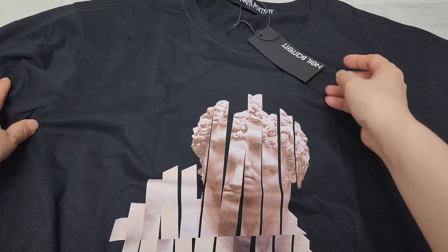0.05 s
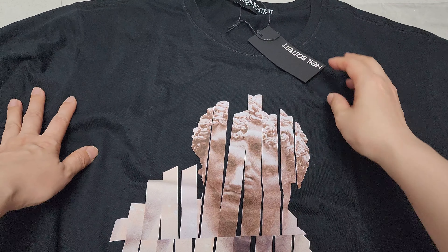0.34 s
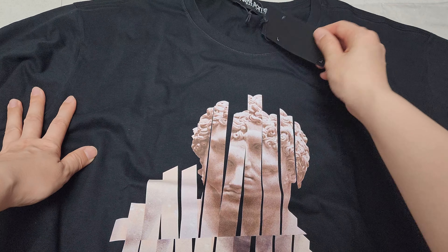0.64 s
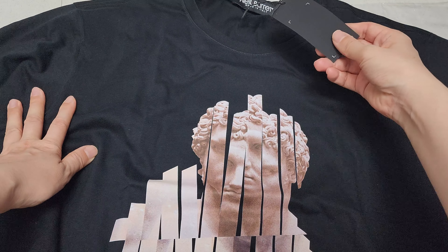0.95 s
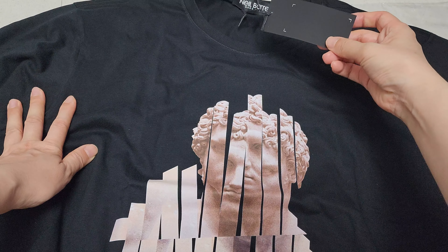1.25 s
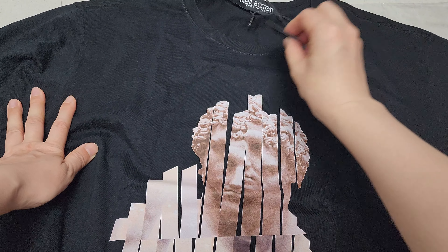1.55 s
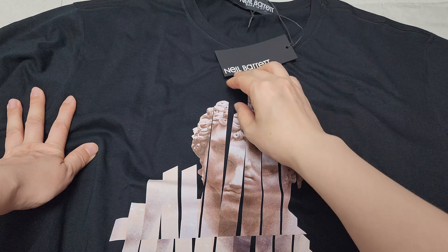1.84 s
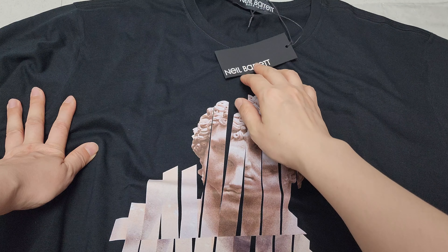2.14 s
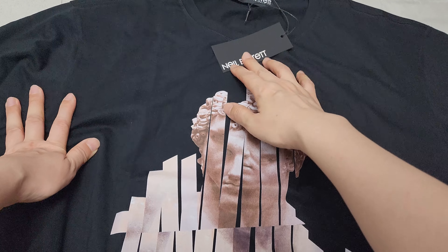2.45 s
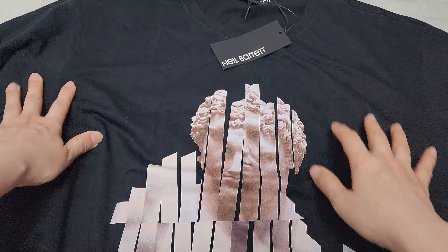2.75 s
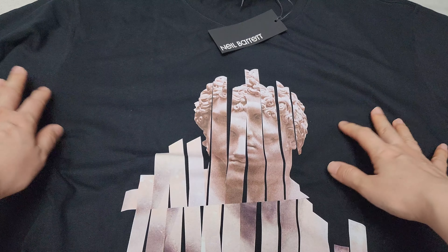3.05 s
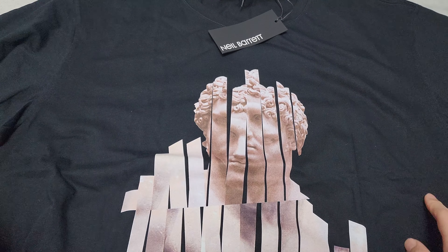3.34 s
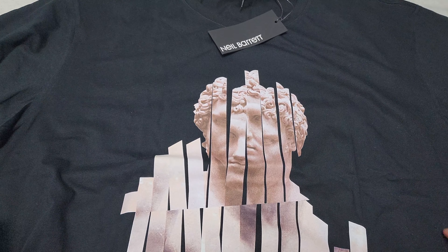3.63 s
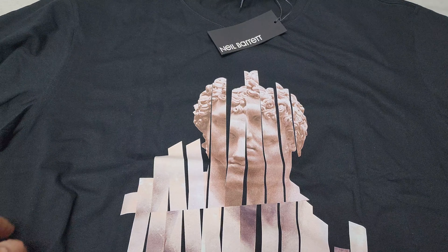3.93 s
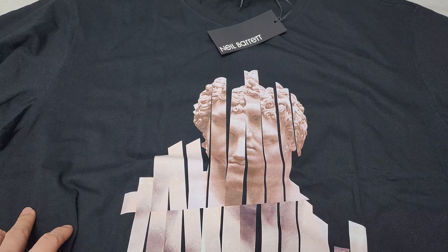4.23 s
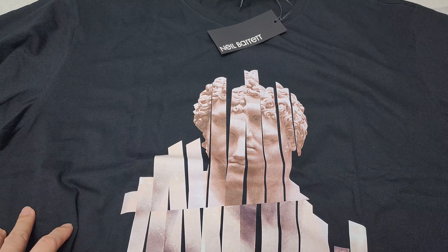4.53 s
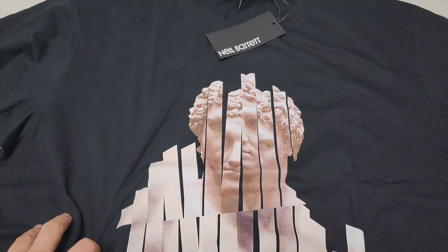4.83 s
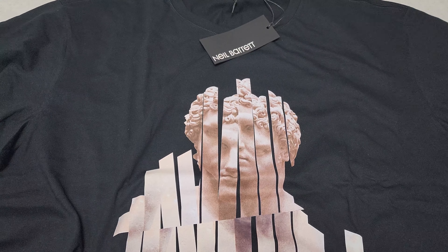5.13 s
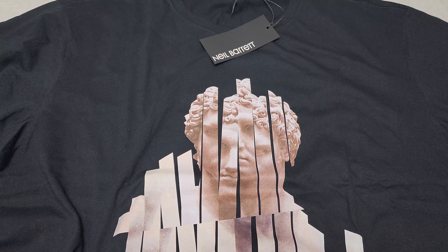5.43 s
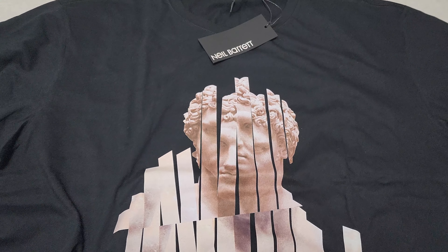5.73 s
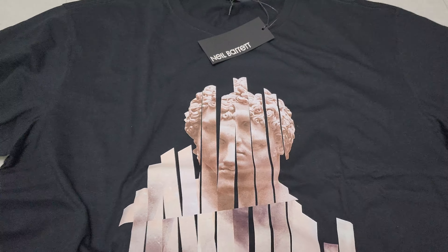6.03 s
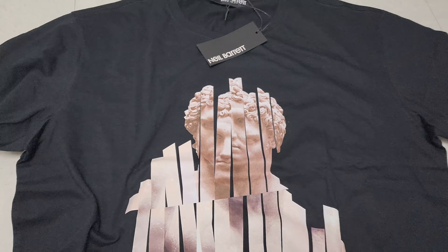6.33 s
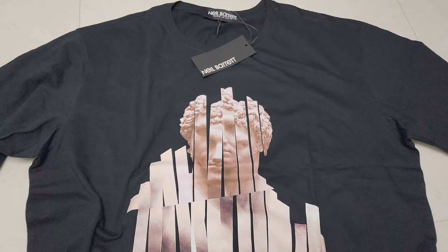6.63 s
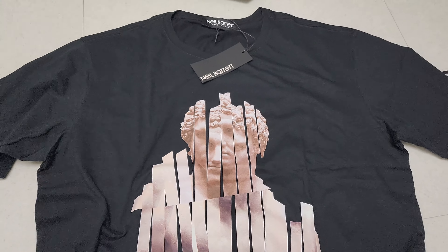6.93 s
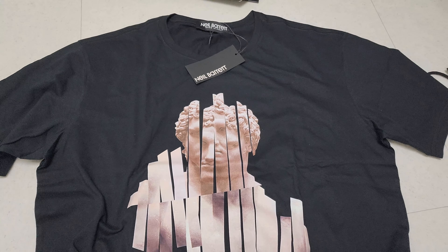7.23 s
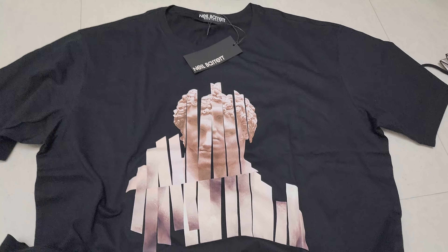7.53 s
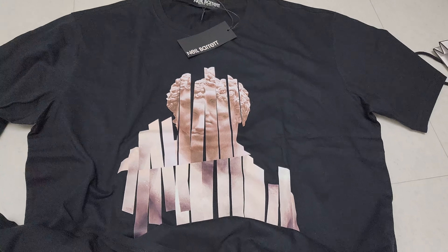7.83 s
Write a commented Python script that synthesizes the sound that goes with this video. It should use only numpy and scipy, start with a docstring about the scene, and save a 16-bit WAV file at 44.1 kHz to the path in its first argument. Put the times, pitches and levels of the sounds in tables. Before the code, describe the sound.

In a small, quiet room, hands work over a cotton T-shirt close to the microphone. First come faint slides and light taps of its card tag, then hissing palm strokes with a few soft thuds. A louder rustle follows, with folds scraping and creases snapping. Finally the phone's plastic case clicks sharply and its body rumbles as it is lifted, while faint fabric swishes continue.

```python
"""A cotton T-shirt on the floor hisses under a smoothing palm, then is gathered up with a crisp rustle:
threads catch and slip, folds scrape, creases snap over. First, hands lift its card hang tag, which
whispers and taps. Towards the end the phone above is gripped and raised, so its body rumbles and its
plastic case clicks. Soft bumps thud through it along the way. A small, quiet room answers every sound."""
import sys
import numpy as np
from scipy import signal
from scipy.fft import rfft, irfft
from scipy.io import wavfile

SR = 44100
rng = np.random.default_rng(int(sys.argv[2]) if len(sys.argv) > 2 else 0)


def to_wav(sig):
    """Store sig (one row per channel, or 1-D mono) as 16-bit WAV at the path in sys.argv[1].

    Samples outside -1..1 are clipped; the rate is SR.
    """
    pcm = np.clip(np.atleast_2d(sig), -1, 1) * 32767
    pcm = np.round(pcm).astype(np.int16)
    wavfile.write(sys.argv[1], SR, pcm.T)  # frames by channels


N = 347067
T = np.arange(N) / SR


def undb(db):
    """Decibels to gain."""
    return 10 ** (np.asarray(db) / 20)


def unit(x):
    """Scale to rms 1."""
    return x / np.sqrt(np.mean(x ** 2))


def fading(t, t60):
    """Exponential decay that falls 60 dB in t60 seconds."""
    return np.exp(-np.log(1000) * t / t60)


def on_log(hz, points):
    """Read a curve of (Hz, value) points on a log-frequency axis."""
    f, value = np.transpose(points)
    return np.interp(np.log(hz + 1), np.log(f), value)


def freqs(x):
    """Frequencies of the spectrum bins of x."""
    return np.fft.rfftfreq(x.shape[-1], 1 / SR)


def shape(x, db):
    """Minimum-phase EQ with the given gain in each bin."""
    size = x.shape[-1]
    cepstrum = irfft(np.log(undb(db)), size)
    cepstrum[..., 1:size // 2] *= 2
    cepstrum[..., size // 2 + 1:] = 0
    return irfft(rfft(x) * np.exp(rfft(cepstrum)), size)


def colour(x, curve):
    """Run x through an EQ curve and bring it to rms 1."""
    return unit(shape(x, on_log(freqs(x), curve)))


def walk(rate):
    """Random wander with rate turning points a second, spread near 1."""
    knots = rng.standard_normal(int(N / SR * rate) + 2)
    return np.interp(T * rate, np.arange(len(knots)), knots)


def panned(x, pan_db):
    """Mono to stereo; pan is left minus right in dB."""
    return np.array([x * undb(pan_db / 2), x * undb(-pan_db / 2)])


def add(out, s, sound):
    """Mix a sound in at s seconds."""
    start = int(s * SR)
    out[:, start:start + sound.shape[1]] += sound[:, :N - start]


def speed(s, rise_s, fall_s):
    """Speed of a hand movement, 0-1: it starts at s, speeds up, and slows to rest."""
    return np.sin(np.pi / 2 * np.interp(T, [s, s + rise_s, s + rise_s + fall_s], [0, 1, 0]))


def slips(rate, spread_db, clump_db, clump_rate):
    """Friction, catching and letting go: tiny clicks of uneven size that swell in clumps."""
    clicks = (rng.random(N) < rate / SR) * rng.choice([-1, 1], N)
    size_db = spread_db * np.minimum(rng.exponential(size=N), 4)
    return clicks * undb(size_db + clump_db * walk(clump_rate))


def ring(modes, t, detune):
    """A struck body's decaying modes, a little detuned by each new contact."""
    return sum(undb(db) * np.sin(2 * np.pi * hz * rng.normal(1, detune) * t) * fading(t, t60)
               for hz, db, t60 in modes)


# The small room's reverb time. Each row: frequency in Hz, t60 in seconds.
ROOM_DECAY = [(150, 0.27), (1000, 0.15), (4000, 0.17), (14000, 0.18)]
def room(x, lag_s, near_db, tail_db):
    """One spot in the room: direct sound (lag_s later on the left), floor and hand scatter, then walls."""
    t = T[:SR // 3]
    direct = np.zeros((2, len(t)))
    direct[0, max(int(lag_s * SR), 0)] = 1
    direct[1, max(int(-lag_s * SR), 0)] = 1
    scatter = rng.standard_normal(direct.shape) * fading(t, t60=0.007) * (t > abs(lag_s))
    early = unit(direct) + undb(near_db) * unit(scatter)
    flatten_db = -20 * np.log10(np.abs(rfft(early)) + 1e-6)  # smear the sound without colouring it
    early = shape(early, flatten_db) * fading(t, t60=0.3)
    noise, tail = rfft(rng.standard_normal(direct.shape)), 0
    for hz in 70 * 3. ** np.arange(5):
        band = irfft(noise * (freqs(t) >= hz) * (freqs(t) < 3 * hz), len(t))
        tail = tail + band * fading(t, on_log(2 * hz, ROOM_DECAY))
    tail = tail * np.minimum(t / 0.0052, 1)
    response = unit(unit(early) + undb(tail_db) * unit(tail)) / np.sqrt(len(t))
    return signal.fftconvolve(x, response, axes=1)[:, :N]


def spread(x, lag_s, near_db, tail_db, spots=5):
    """A wide, moving surface: the sound wanders between several spots, each with its own echoes."""
    shares = np.array([undb(8 * walk(40)) for _ in range(spots)])
    shares /= np.linalg.norm(shares, axis=0)
    return sum(room(x * share, lag_s + rng.normal(0, .00008), near_db, tail_db) for share in shares)


def contacts(cues, curve, length_s, focus_db, lag_s, near_db, tail_db, modes=(), ring_db=0):
    """Each contact is a brief chatter of micro-impacts, its tone focused around the cue's brightness."""
    out, t = np.zeros((2, N)), T[:SR // 6]
    attack = 1 - fading(t, length_s / 4)
    for s, db, hz, pan_db in cues:
        chatter = unit(rng.laplace(size=len(t)) * attack * fading(t, length_s))
        if len(modes):
            chatter = chatter + undb(ring_db) * unit(ring(modes, t, detune=0.016))
        octaves = np.log2((freqs(t) + 100) / hz)
        hit = shape(chatter, on_log(freqs(t), curve) - focus_db * np.hypot(octaves, 1))
        hit = unit(hit) * np.sqrt(length_s) * undb(db)
        add(out, s, room(panned(hit, pan_db), lag_s, near_db, tail_db))
    return out


# The bed of room air. Each row: frequency in Hz, gain in dB.
AIR_EQ = [(25, -7), (55, 2), (100, -6.5), (145, 0.5), (200, -12), (270, -19), (800, -17.5), (1200, -22.5),
          (1800, -20.5), (2400, -29), (5000, -31), (7800, -28.5), (9500, -48.5), (16000, -45.5)]
def room_tone():
    """A low rumble common to both sides and leaning left, under a wide, steady hiss."""
    shared, separate = rng.standard_normal(N), rng.standard_normal((2, N))
    width = undb(on_log(freqs(shared), [(100, -16), (300, -2), (800, 12), (4000, 12.5)]))
    lean_db = on_log(freqs(shared), [(60, 9.9), (150, 3.9), (500, .5), (8000, .3)])
    spectrum = (rfft(shared) + width * rfft(separate)) / np.hypot(1, width)
    noise = irfft(spectrum * panned(1, lean_db), N)
    return colour(noise, AIR_EQ) * undb(-61.5 + 1.2 * walk(1.8))


# The tag's airy whisper. Each row: frequency in Hz, gain in dB.
TAG_SLIDE_EQ = [(1000, -4), (3000, 0.5), (5200, -0.5), (7800, 4), (10000, -7), (16000, -8.5)]
# Slides of the tag. Each row: start, rise and fall in seconds, relative level in dB.
TAG_SLIDES = [(0, 0.0058, 0.072, -63.5), (.22, 0.024, 0.11, -65.5), (.47, .1, .08, -56.5),
              (.73, 0.051, .06, -68.5), (.87, 0.033, 0.088, -66.5), (.93, 0.098, .16, -66.5),
              (1.32, 0.13, 0.047, -66.5), (1.57, .06, .11, -65.5)]
def tag_slides():
    """Smooth card on skin and cotton whispers in the upper treble, louder the faster it moves."""
    slides = sum(undb(db) * speed(s, rise_s, fall_s) ** 0.85 for s, rise_s, fall_s, db in TAG_SLIDES)
    held = undb(-79) * np.sqrt(speed(0, rise_s=0.15, fall_s=2.1))  # faint while it is in the fingers
    hiss = colour(slips(rate=9000, spread_db=4, clump_db=3.5, clump_rate=29), TAG_SLIDE_EQ) * undb(-1.5)
    return spread(panned(hiss * np.hypot(slides, held), pan_db=3.5), lag_s=0, near_db=8.5, tail_db=-5)


# The low modes behind each thud. Each row: frequency in Hz, gain in dB, t60 in seconds.
BUMP_MODES = [(55, -7, 0.48), (70.6, 2, 0.22), (120.9, 0.5, 0.24), (143.5, 0.5, .18), (172, -5.5, 0.13),
              (254, -12.5, 0.26), (378, -19, .1)]
# Soft bumps. Each row: start in seconds, relative level in dB, pitch centre in Hz.
BUMPS = [(0.241, -42.5, 133), (0.293, -44, 55), (2.804, -41.5, 70.4), (2.887, -42, 127),
         (3.231, -37.5, 150), (3.773, -35, 125), (4.249, -45, 179), (4.355, -42, 122), (4.78, -40, 128),
         (5.997, -35, 108), (6.039, -39.5, 67.5), (6.099, -36, 160), (6.16, -36.5, 104.5),
         (6.199, -39, 162.7), (6.528, -29.5, 137), (6.56, -36.5, 113), (6.576, -33.5, 70),
         (6.825, -35, 174.8), (7.129, -34.5, 178)]
def soft_bumps():
    """Padded blows thud through the phone and wake only low modes, a little stronger on the left."""
    out, t = np.zeros((2, N)), T[:SR // 2]
    for s, db, hz in BUMPS:
        octaves = np.log2((freqs(t) + 1) / hz)
        thud = shape(ring(BUMP_MODES, t, detune=.04), -9 * np.hypot(octaves, .5))
        thud = thud / np.abs(thud).max() * undb(db + 1.5)
        add(out, s, room(panned(thud, pan_db=3), lag_s=0, near_db=-12, tail_db=-8.5))
    return out


# The tone of a fingertip on cotton. Each row: frequency in Hz, gain in dB.
FINGERTIP_EQ = [(200, 11), (700, -2), (1800, -3.5), (2500, -5), (3000, 2.5), (3800, 2), (5000, -12.5),
                (6700, -5.5), (10000, -16.5), (16000, -20)]
# Fingertip catches. Each row: start in seconds, relative level in dB, brightness in Hz, pan in dB.
CATCHES = [(.25, -57, 1690, 2), (.345, -60, 1900, 3), (2.468, -47.5, 1620, 2), (2.81, -52, 1800, 0),
           (3.2313, -28, 3200, 4.5), (3.2352, -37, 3100, -6), (3.244, -46, 3400, 3),
           (3.273, -39.5, 2600, -5), (3.291, -35.5, 3200, 0), (3.298, -35, 3400, 5), (3.772, -49, 1200, 10)]
def fingertip_catches():
    """Fingertips land on the cloth and catch with a short rasp."""
    rasps = contacts(CATCHES, FINGERTIP_EQ, length_s=0.011, focus_db=6,
                     lag_s=-.0004, near_db=5, tail_db=-1.5)
    return undb(-1) * rasps


# The squeak's narrow peak. Each row: frequency in Hz, gain in dB.
SQUEAK_EQ = [(1000, -32), (1750, -14), (1950, 3), (2150, -14), (2550, -12), (2900, -22), (6000, -40)]
# Faint squeaks. Each row: start, rise and fall in seconds, level in dB.
SQUEAKS = [(.27, 0.063, .1, -72), (2.7, 0.036, 0.071, -71), (3.03, .09, .1, -70), (6.83, 0.028, 0.046, -62)]
def skin_squeaks():
    """Dragging skin sticks and slips in a narrow, faintly pitched band."""
    level = sum(undb(db) * speed(s, rise_s, fall_s) for s, rise_s, fall_s, db in SQUEAKS)
    squeak = colour(slips(rate=990, spread_db=-0.5, clump_db=4, clump_rate=40), SQUEAK_EQ)
    return room(panned(squeak * level, pan_db=3), lag_s=0, near_db=0, tail_db=-3)


# The tone of tapped card. Each row: frequency in Hz, gain in dB.
TAG_TAP_EQ = [(100, 2), (580, -3), (760, -6.5), (1200, 1), (2500, -2), (3500, -7.5), (6000, -4.5),
              (9000, -6.5), (16000, -26)]
# The card's short ring. Each row: frequency in Hz, gain in dB, t60 in seconds.
TAG_MODES = [(607, -5.5, 0.027), (1220, -9.5, 0.038), (1500, -8.5, 0.018), (1856, -7.5, 0.061),
             (2405, -13, 0.054)]
# Taps of the tag. Each row: start in seconds, relative level in dB, brightness in Hz, pan in dB.
TAG_TAPS = [(.598, -34.5, 1310, 2), (.603, -39, 560, 2), (.611, -36.5, 2610, 0), (.622, -51, 1200, 5),
            (1.587, -53.5, 1300, 4), (1.645, -37.5, 1820, 1), (1.664, -39, 1850, 0),
            (1.699, -39.5, 1640, 0.5)]
def tag_taps():
    """The card tag taps down lightly and rings for an instant."""
    taps = contacts(TAG_TAPS, TAG_TAP_EQ, length_s=0.03, focus_db=9,
                    lag_s=0, near_db=4, tail_db=-5.5, modes=TAG_MODES, ring_db=-9)
    return undb(-6.5) * taps


# A stroke's three layers: fibre hiss, silky top, dull drag. Each row: frequency in Hz, gain in dB.
FIBRE_EQ = [(300, -13.5), (1500, -12.5), (3000, -3.5), (4500, -0.5), (7300, 3.5), (9500, -3.5),
            (12500, -18.5), (16000, -29)]
SILKY_EQ = [(4000, -38.5), (8000, -8), (10000, 0.5), (13000, 3), (16000, 0.5)]
DRAG_EQ = [(100, -6), (250, 3.5), (650, -4), (1100, -5.5), (2300, -5), (4000, -15.5), (9000, -17),
           (16000, -36.5)]
# Palm strokes. Each row: start, rise and fall in seconds, then hiss fader, silky top against the hiss,
# drag fader and pan, all in dB.
STROKES = [(2.17, 0.025, 0.28, -68.5, -13, -73, 2), (2.32, .14, 0.32, -59, -6.5, -75, 0.5),
           (2.699, 0.071, 0.12, -65, -6, -57, 1.5), (2.83, 0.095, 0.15, -51, -5, -53.5, -1.5),
           (3.02, .08, 0.37, -90, -8, -66.5, 5), (3.3, 0.085, 0.08, -57.5, -6.5, -70, 1.5),
           (3.38, 0.1, 0.3, -65.5, -2.5, -88, -2.5), (3.74, 0.053, 0.78, -70.5, -8, -87, 0.5),
           (5.24, 0.29, 0.19, -88, -12, -52, -3), (5.8, 0.16, 0.42, -61, -4.5, -65.5, -3.5),
           (6.06, .17, 0.18, -68.5, -6, -62.5, 7.5), (6.271, 0.24, .5, -71.5, -6, -64.5, 4.5),
           (6.8, 0.49, 0.36, -81, -2.5, -71, 9), (7.331, 0.21, .13, -69, 5, -72, 1),
           (7.59, 0.22, 0.18, -62, -1, -76, -2)]
def palm_strokes():
    """Skin slides over the weave: a fine hiss, and a duller drag where the cloth moves with it."""
    fibres = slips(rate=18000, spread_db=0.5, clump_db=2, clump_rate=160)
    hiss = colour(fibres, FIBRE_EQ) * undb(-1.5)
    silky = colour(fibres, SILKY_EQ) * undb(-0.5)
    drag = colour(slips(rate=4300, spread_db=1, clump_db=4, clump_rate=59), DRAG_EQ) * undb(-5.5)
    out = np.zeros((2, N))
    for s, rise_s, fall_s, hiss_db, silky_db, drag_db, pan_db in STROKES:
        rub = (hiss + silky * undb(silky_db)) * undb(hiss_db) + drag * undb(drag_db)
        out += panned(rub * speed(s, rise_s, fall_s) ** 1.26, pan_db)  # faster is louder
    return spread(out, lag_s=0, near_db=6.5, tail_db=-1.5)


def grab(s, hold_s, attack_s=0.013, sag_db_per_s=4, settle_t60_s=0.21):
    """Envelope of one handful: a quick rise, a sagging hold, then the cloth settles."""
    t = np.maximum(T - s, 0)
    settle = fading(np.clip(t - hold_s, 0, 1), settle_t60_s)
    return np.minimum(t / attack_s, 1) * undb(-sag_db_per_s * t) * settle


# The rustle's layers: scraping folds, crisp grit, creases. Each row: frequency in Hz, gain in dB.
FOLD_EQ = [(60, -2.5), (140, 1.5), (250, -3), (400, 1), (550, -6.5), (750, -1), (1100, 4.5), (1900, 2),
           (2800, -5.5), (5000, -2.5), (8000, -19.5), (16000, -48)]
CRISP_EQ = [(500, -13), (2000, -1), (4000, -0.5), (7000, 2), (9000, -5), (12000, -10), (16000, -10)]
CREASE_EQ = [(100, 1.5), (500, -7.5), (1800, 1.5), (4000, 0), (7000, 0), (9500, -3.5), (16000, -7)]
# Handfuls of cloth. Each row: start and hold in seconds, then fold fader, crisp fader and pan in dB.
HANDFULS = [(4.067, 0.076, -51.5, -50.5, 1.5), (4.146, 0.024, -45, -59, 4), (4.19, 0.098, -41, -38, 1),
            (4.298, 0.14, -48.5, -45, 3.5), (4.452, 0.12, -48, -44.5, 1), (4.582, 0.092, -43, -43.5, 0.5),
            (4.692, 0.039, -42.5, -44.5, 2), (4.753, 0.17, -44.5, -42.5, 1),
            (4.943, 0.048, -48, -47.5, -0.5), (5, .08, -42.5, -47.5, 3), (5.125, 0.022, -43, -55, -1.5),
            (5.184, 0.03, -54, -61, 2), (5.241, 0.075, -57, -69, -1), (5.35, 0.14, -55, -75, 4),
            (5.458, .11, -46.5, -49.5, 0), (5.607, 0.033, -66, -59, 6), (5.68, 0.029, -47.5, -51.5, 2)]
def gathering_rustle():
    """Folds scrape over each other with each handful while small creases crackle at random."""
    grit = slips(rate=3500, spread_db=3.5, clump_db=3.5, clump_rate=130)
    scrape = colour(grit, FOLD_EQ) * undb(-2.5)
    crisp = colour(grit, CRISP_EQ) * undb(-1.5)
    crackle = colour(slips(rate=60, spread_db=2.5, clump_db=1.5, clump_rate=12), CREASE_EQ) * undb(-9)
    out = np.zeros((2, N))
    for s, hold_s, fold_db, crisp_db, pan_db in HANDFULS:
        rustle = scrape * undb(fold_db) + (crisp + crackle) * undb(crisp_db)
        out += panned(rustle * grab(s, hold_s), pan_db)
    return spread(out, lag_s=.0004, near_db=2.5, tail_db=-5, spots=9)


# The loudest creases. Each row: start in seconds, relative level in dB, brightness in Hz, pan in dB.
CREASES = [(4.08, -24.5, 2920, -4), (4.159, -22, 4050, -6.5), (4.188, -25.5, 5120, -4),
           (4.237, -21, 3100, -5), (4.301, -21.5, 5600, -8), (4.327, -17.5, 9000, -8.5),
           (4.332, -26, 6560, 11), (4.358, -22, 2410, 14), (4.363, -20, 1980, -8.5),
           (4.391, -25.5, 4100, -9), (4.452, -16.5, 5700, -3), (4.649, -19, 6500, -7),
           (4.658, -16, 5900, -5), (4.663, -16.5, 4500, -2), (4.75, -18.5, 7900, -7),
           (4.785, -25.5, 1440, 0), (4.838, -17.5, 5370, -4), (4.853, -27.5, 820, -10),
           (4.899, -20, 2600, -5.5), (4.906, -28, 2460, 3), (4.985, -27.5, 2060, -3),
           (5.049, -21, 2090, -6), (5.114, -28.5, 4480, -9.5), (5.133, -30.5, 5000, -3),
           (5.191, -30.5, 2000, -4), (5.465, -31.5, 4040, -7), (5.611, -30, 5130, -7),
           (5.693, -31.5, 825, -4.5)]
def crease_snaps():
    """Big creases snap over: sharp accents on top of the rustle, mostly to the right."""
    snaps = contacts(CREASES, CREASE_EQ, length_s=0.0088, focus_db=6, lag_s=.0004, near_db=4, tail_db=-4)
    return undb(-4) * snaps


# The bass-heavy tone of the grip. Each row: frequency in Hz, gain in dB.
GRIP_EQ = [(25, -10.5), (70, 2.5), (125, 1.5), (220, -16), (450, -22.5), (900, -31), (3000, -59.5)]
def grip_rumble():
    """Fingers shift on the phone as it is raised: a low, uneven rumble through its body."""
    rumble = colour(slips(rate=120, spread_db=3.5, clump_db=3.5, clump_rate=14), GRIP_EQ)
    rumble = rumble * speed(5.45, rise_s=0.87, fall_s=.65) * undb(-54.5)
    return room(panned(rumble, pan_db=8), lag_s=0, near_db=-9, tail_db=-7)


# The case's tone, and the extra knock on the left. Each row: frequency in Hz, gain in dB.
CASE_EQ = [(100, 3), (400, 10.5), (620, -6), (850, -3), (1150, -6.5), (1750, 3.5), (2700, -7.5),
           (4000, -2.5), (5500, -3.5), (8000, -3), (10000, -9.5), (16000, -8.5)]
LEFT_KNOCK_EQ = [(100, 2), (300, 1), (550, 5.5), (1200, 7), (1800, 1), (4000, -2), (10000, 0)]
# The plastic's ring. Each row: frequency in Hz, gain in dB, t60 in seconds.
CASE_MODES = [(1400, -6, 0.075), (1840, -7.5, 0.024), (1780, -1.5, 0.032), (4000, -4, 0.074),
              (5090, -11.5, 0.085), (5600, -2.5, 0.034), (6140, -5.5, .07), (7200, -4.5, 0.071),
              (8240, -5.5, 0.037), (11300, -0.5, 0.074)]
# Case clicks. Each row: start in seconds, relative level in dB, brightness in Hz, pan in dB.
CASE_CLICKS = [(5.848, -46, 800, 9), (6.052, -48.5, 900, 15), (6.070, -30.5, 1410, 4),
               (6.099, -16, 10000, 0), (6.106, -32, 1390, 6.5), (6.170, -44, 1500, 7),
               (6.197, -27, 6300, -1), (6.295, -45.5, 8000, -5.5), (6.528, -14.5, 3200, 6),
               (6.553, -27, 1800, -1), (6.565, -13.5, 2700, 1), (6.568, -10, 5400, -2),
               (6.730, -51.5, 700, 14), (6.783, -47.5, 2500, 7), (6.86, -51.5, 2980, 9),
               (7.535, -42, 5500, 5)]
def case_clicks():
    """Hard plastic clicks up close; the phone's body carries their low knock to the left side."""
    left, right = contacts(CASE_CLICKS, CASE_EQ, length_s=0.016, focus_db=8,
                           lag_s=0, near_db=4.5, tail_db=-6.5, modes=CASE_MODES, ring_db=-11)
    left = shape(left, on_log(freqs(left), LEFT_KNOCK_EQ))
    return undb(-5) * np.array([left, right])


def scene():
    """Mix the shirt and its tag with the phone's handling noise, over the room tone."""
    friction = palm_strokes() + skin_squeaks() + tag_slides() + gathering_rustle()
    accents = crease_snaps() + tag_taps() + fingertip_catches()
    handling = case_clicks() + soft_bumps() + grip_rumble()
    return friction + accents + handling + room_tone()


def record(dry):
    """The phone cuts the top with a steep low-pass at 15.9 kHz."""
    return signal.sosfilt(signal.ellip(10, .2, 80, 15900, fs=SR, output="sos"), dry)


dry = scene()
out = record(dry)
to_wav(out)
```